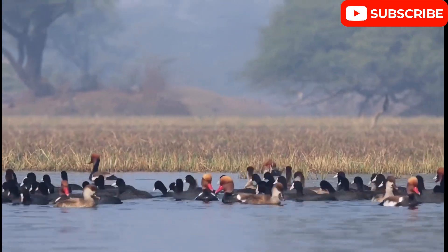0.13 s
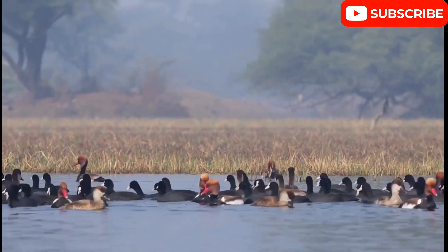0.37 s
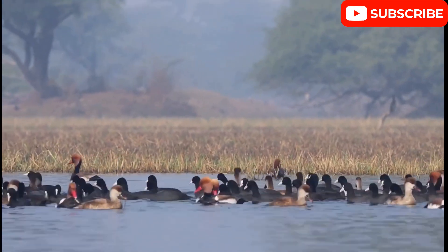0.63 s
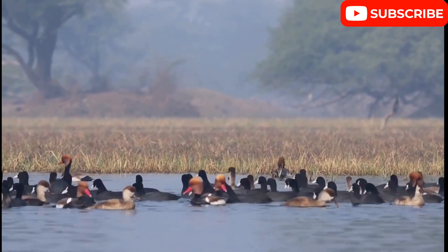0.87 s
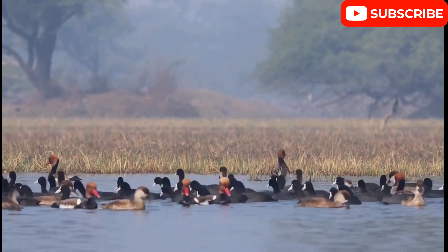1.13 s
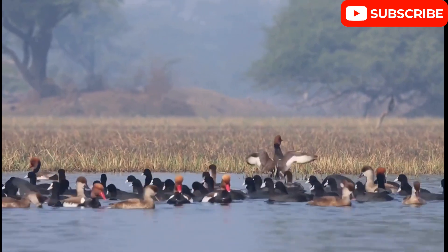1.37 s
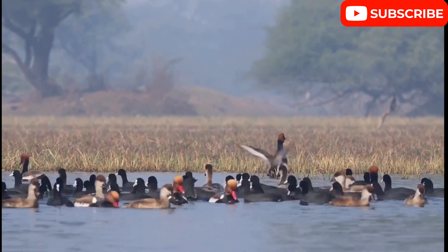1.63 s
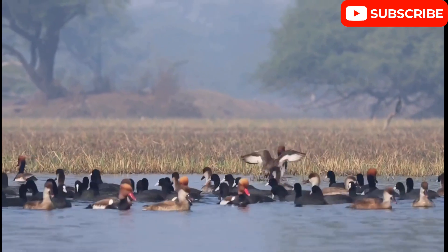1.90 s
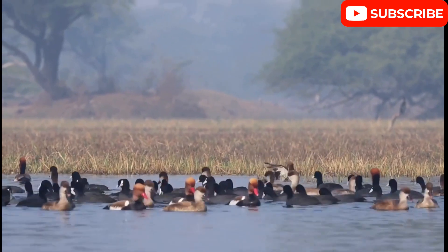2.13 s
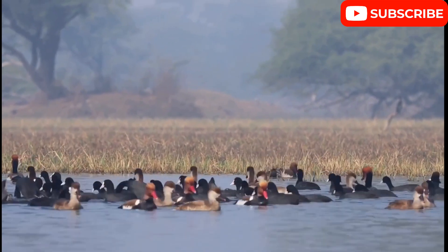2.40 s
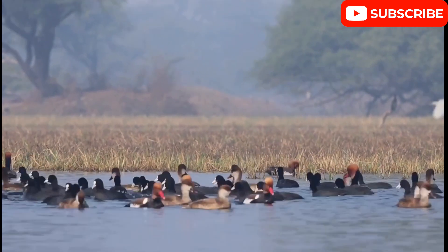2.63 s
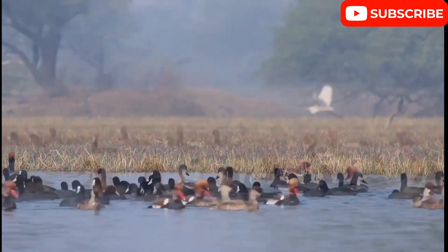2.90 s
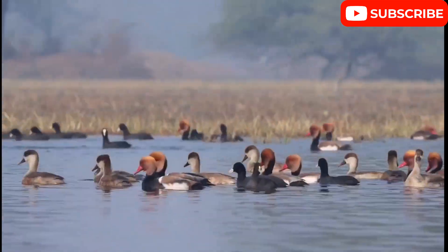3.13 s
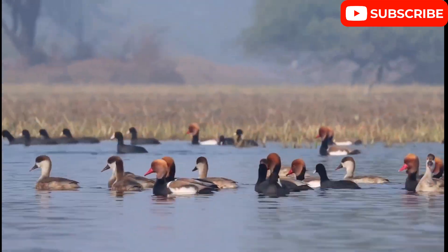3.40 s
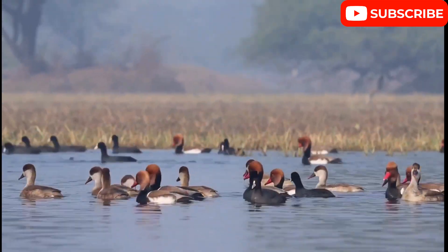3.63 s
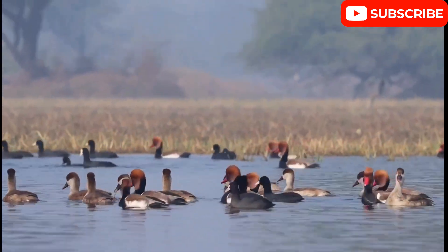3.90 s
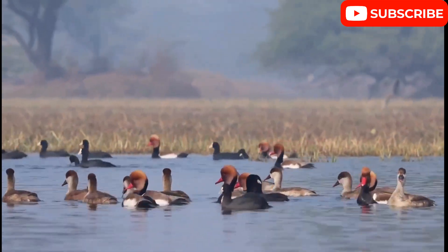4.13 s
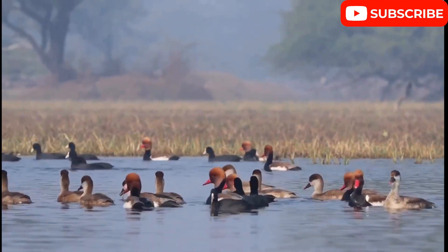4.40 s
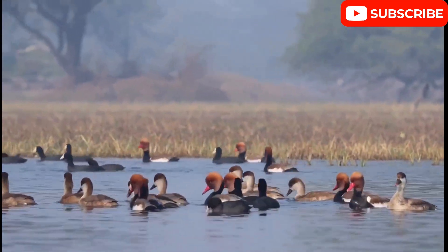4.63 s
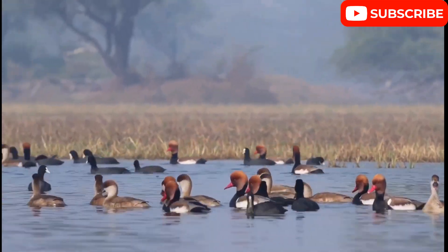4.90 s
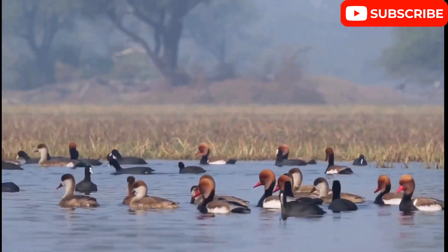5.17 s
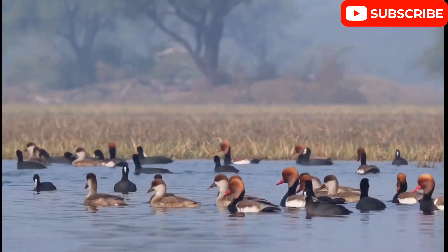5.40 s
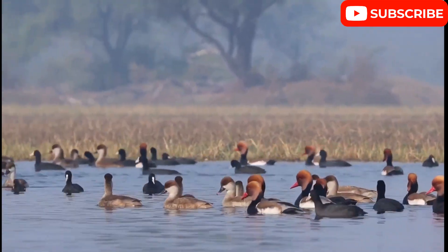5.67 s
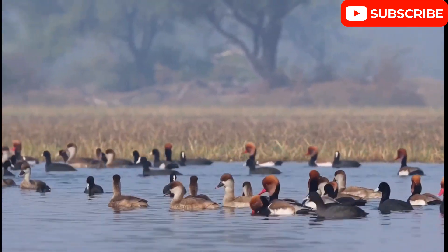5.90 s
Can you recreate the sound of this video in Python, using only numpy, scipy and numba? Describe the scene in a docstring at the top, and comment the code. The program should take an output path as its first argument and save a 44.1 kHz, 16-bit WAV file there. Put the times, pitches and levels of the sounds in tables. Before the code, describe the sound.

A flock of waterbirds rasps and wheezes in quick overlapping bursts with sharp throat clicks, fainter birds gabbling behind over soft lake hiss.

```python
"""A flock of ducks on open water gives short harsh wheezy calls, several birds overlapping.
Each call is a fast uneven pulse train ringing in the windpipe and throat, while a mouth resonance
sweeps up and down as the bill opens. Farther birds are hoarse voices blurred by scattered echoes;
small splashes and a lake hiss, both shaped noise, lie below."""
import sys
import numpy as np
from scipy import signal
from scipy.fft import rfft, irfft, next_fast_len
from scipy.io import wavfile
from scipy.ndimage import uniform_filter1d, minimum_filter1d
from numba import njit

SR = 44100
rng = np.random.default_rng(int(sys.argv[2]) if len(sys.argv) > 2 else 0)


def field_ratio(decibels):
    """Amplitude ratio for a level in dB (20 dB per decade); scalars and array-likes work."""
    return 10 ** (np.asarray(decibels, dtype=float) / 20)


def output_pcm(signal):
    """Save a mono or channel-first signal as 16-bit PCM at the path in sys.argv[1].

    Samples are clipped to [-1, 1] before scaling.
    """
    pcm = np.clip(np.atleast_2d(signal).T, -1, 1) * 32767
    wavfile.write(sys.argv[1], SR, np.round(pcm).astype(np.int16))


N = 266011


def rms_one(x):
    """Scale to unit rms."""
    return x / np.sqrt(np.mean(x ** 2) + 1e-20)


def columns(rows):
    """The samples a table spans, and its columns interpolated along them."""
    s, *values = np.transpose(rows)
    at = np.arange(max(round(s[0] * SR), 0), min(round(s[-1] * SR), N))
    return [at] + [np.interp(at / SR, s, v) for v in values]


def at_hz(points, hz):
    """Read a spectrum on a log-frequency axis."""
    point_hz, values = np.transpose(points)
    return np.interp(np.log(hz), np.log(point_hz), values)


def drift(per_s, size):
    """Random wander: straight lines between unit normal knots, at most 59 knots per s."""
    knots = rng.standard_normal(int(size * 60 / SR) + 60)
    return np.interp(np.arange(size) * np.minimum(per_s, 59) / SR, np.arange(len(knots)), knots)


def add(out, at, sound, pan_db=0.):
    """Mix a sound in with 3 ms soft ends; pan_db is left over right."""
    from_start = np.arange(len(at))
    edge = np.minimum(1, np.minimum(from_start, from_start[::-1]) / (0.003 * SR))
    out[:, at] += sound * edge * field_ratio(np.array([[.5], [-.5]]) * pan_db)


def swelling(loudest, swell_s, release_s, depth_db, bends):
    """The samples of a call, the part of it gone by (-1 start, 0 loudest, 1 end) and its gain."""
    at, part = columns([(loudest - swell_s, -1), (loudest, 0), (loudest + release_s, 1)])
    return at, part, field_ratio(-depth_db * np.abs(part) ** np.where(part < 0, *bends))


@njit
def resonate(x, hz, width_hz, sr):
    """Moving resonance, four passes for dark skirts, back and forth so rings swell as softly as they die."""
    r = np.exp(-np.pi * width_hz / sr)
    for _ in range(4):
        y = np.zeros(len(x))
        for i in range(2, len(x)):
            drive = (1 - r) * (x[i] - x[i - 2])
            y[i] = drive + 2 * r * np.cos(2 * np.pi * hz[i] / sr) * y[i - 1] - r * r * y[i - 2]
        x, hz = y[::-1].copy(), hz[::-1].copy()
    return x


BREATH, WAVER = 2.6, .07
THIRD_PULSE_DB = 2.5   # every third pulse is stronger


def voice(per_s, rough, hz, width_hz):
    """Uneven membrane pulses plus breath gated on each cycle, ringing in one resonance; level evened."""
    size, rough = len(hz), np.clip(rough, 0, 1)
    cycles = np.cumsum(per_s * (1 + WAVER * rough * drift(55, size)) / SR) + rng.random()
    third_db = THIRD_PULSE_DB * (cycles % 3 < 1)
    strength = field_ratio(4.0 * rough * rng.standard_normal(size) + third_db)
    pulses = np.diff(np.floor(cycles), prepend=np.floor(cycles[0])) * strength
    gate = np.exp(-3.0 * (cycles % 1)) * np.sqrt(per_s / SR)
    breath = rng.standard_normal(size) * gate * field_ratio(third_db)
    rung = resonate((1 - rough) * pulses + BREATH * rough * breath, hz, width_hz, SR)
    return rung / np.sqrt(uniform_filter1d(rung ** 2, size=1400) + 1e-12)


# left-right likeness of noise: (f/Hz, likeness 0-1)
NOISE_LIKENESS = [(700, 0.76), (1400, 0.32), (3000, 0.15), (7000, 0.13), (11000, 0.54), (15000, 0.4)]


def coloured(spectrum, patchy_db):
    """Stereo noise in overlapping quarter-octave bands, each with its own flicker; rms 1."""
    size = next_fast_len(N)
    hz = np.maximum(np.arange(size // 2 + 1) * SR / size, 1)
    mid, side = rfft(rng.standard_normal((2, size))) * field_ratio(at_hz(spectrum, hz))
    alike = np.clip(at_hz(NOISE_LIKENESS, hz), 0, 1)
    both = np.sqrt(1 + alike) * mid + np.sqrt(1 - alike) * side * [[1], [-1]]
    out, together = 0, drift(3.11, N)
    for k in range(21):
        share = np.interp(4 * np.log2(hz / 500), np.arange(21), np.arange(21) == k)
        flicker = 0.15 * together + (0.74 + 0.036 * k) * drift(36, N)
        out = out + irfft(both * share, size)[:, :N] * field_ratio(patchy_db * flicker)
    return rms_one(out)


# hiss spectrum of the lake: (f/Hz, relative density/dB per Hz)
LAKE_SPECTRUM = [(290, -108), (500, -62), (810, -35), (1290, -8.5), (1660, -1), (2160, -5.5), (2850, -6),
                 (3400, -7), (5190, -7.5), (7820, -17), (9890, -11.5), (11100, -18), (14900, -12.5),
                 (15800, -15), (16500, -63)]
LAKE_DB = -33.5


def lake_hiss():
    """Flickering broadband water noise, slightly louder on the right."""
    return field_ratio(LAKE_DB) * coloured(LAKE_SPECTRUM, patchy_db=3.0) * field_ratio([[-.8], [.8]])


# small splashes: (t/s, click level/dB before the puff shaping)
SPLASH_CLICKS = [(0.557, -29), (0.7427, -28), (1.5994, -29), (1.8794, -29), (2.6279, -24), (3.3593, -28),
                 (3.4595, -29), (3.5473, -28), (5.435, -26), (5.5368, -28), (5.9705, -27)]
# splash noise spectrum: (f/Hz, relative density/dB per Hz)
SPLASH_SPECTRUM = [(500, -60), (1500, 2), (3500, 1), (7000, -16), (12000, -30)]


def splashes():
    """Each splash is a brief puff of water noise with an exponential rise and fade."""
    t_s, level_db = np.transpose(SPLASH_CLICKS)
    clicks = np.full(N, 1e-18)
    clicks[[round(s * SR) for s in t_s]] = field_ratio(level_db)
    fade = np.exp(-1 / (0.0079 * SR))
    rise = np.exp(-1 / (0.0035 * SR))
    puffs = signal.lfilter([1 - rise], np.convolve([1, -fade], [1, -rise]), clicks)
    return puffs * coloured(SPLASH_SPECTRUM, patchy_db=2)


ECHO_T60_S = 0.06


def echoes(x):
    """Scattered reflections from water and reeds, different on each side."""
    t = np.arange(round(.15 * SR)) / SR
    scatter = rng.standard_normal((2, len(t))) * field_ratio(-60 * t / ECHO_T60_S) * (t > .0015)
    scatter /= np.sqrt(np.sum(scatter ** 2, axis=1, keepdims=True))
    return signal.fftconvolve(x, scatter, axes=1)[:, :N]


# swells of the low gabble: (loudest t/s, length/s, level/dB before distance gain)
FLOCK_SWELLS = [(0.083, .08, -34), (.3, 0.2, -31.5), (.48, 0.3, -32.5), (0.745, 0.054, -27.5),
                (0.856, 0.11, -32.5), (1.607, 0.43, -32), (2.26, 0.17, -33.5), (2.634, 0.035, -27.5),
                (2.92, .1, -35), (3.11, 0.12, -34.5), (3.449, 0.13, -29), (3.745, .1, -34.5),
                (3.86, .14, -35.5), (4.146, 0.1, -35), (5.18, .12, -32), (5.444, 0.021, -28.5),
                (5.746, 0.097, -33), (5.88, 0.055, -32), (5.972, 0.057, -32)]
GABBLE_DB, GABBLE_FLICKER_DB, GABBLE_PER_S = -39.5, 2.5, 11
FAR_DEPTH_DB, FAR_BEND, FAR_WIDTH_HZ = 11, 1.7, 460.   # width per resonator pass


def gabble():
    """Low gabble of the flock: one continuous hoarse voice near 1.6 kHz that swells at times."""
    out = np.zeros((2, N))
    level = field_ratio(GABBLE_DB + GABBLE_FLICKER_DB * drift(GABBLE_PER_S, N))
    for loudest, length, level_db in FLOCK_SWELLS:
        at, _, gain = swelling(loudest, length / 2, length / 2, FAR_DEPTH_DB, (FAR_BEND, FAR_BEND))
        level[at] = np.maximum(level[at], field_ratio(level_db) * gain)
    hoarse = voice(300 + 40 * drift(4, N), .7, 1620 + 120 * drift(8, N), width_hz=990.0)
    add(out, np.arange(N), level * hoarse, -2.)
    return out


CHATTER_DB, CHATTER_FLICKER_DB = -45.5, 5.5


def chatter():
    """The other far birds: one faint continuous hoarse voice of flickering level."""
    out = np.zeros((2, N))
    level = field_ratio(CHATTER_DB + CHATTER_FLICKER_DB * drift(12, N))
    hoarse = voice(330 + 30 * drift(5.8, N), 0.53, 2830 + 60 * drift(9, N), FAR_WIDTH_HZ)
    add(out, np.arange(N), level * hoarse, -1.5)
    return out


# clearest farther birds, thinner and higher: (loudest t/s, length/s, level/dB before distance gain, f/Hz)
CLEAR_FAR_CALLS = [(0.091, .14, -31, 2830), (0.182, 0.03, -42, 2620), (0.464, 0.094, -27.5, 2700),
                   (0.651, 0.14, -32.5, 2800), (.99, 0.16, -30, 2760), (1.301, 0.17, -34, 2820),
                   (1.553, 0.079, -32, 2900), (1.662, 0.21, -30.5, 2710), (1.77, 0.066, -32, 2560),
                   (1.86, .1, -32, 2800), (2.132, 0.26, -33, 2830), (2.386, 0.16, -26, 2750),
                   (2.588, 0.052, -35, 2800), (2.817, 0.14, -27.5, 2740), (2.955, 0.095, -31.5, 2790),
                   (3.089, 0.098, -32, 2700), (3.329, 0.23, -34.5, 2780), (3.505, 0.096, -29.5, 2730),
                   (3.699, 0.11, -30.5, 2860), (3.799, .09, -30, 2860), (4.019, .07, -30.5, 2650),
                   (4.339, .1, -37, 2650), (4.454, .05, -39, 2720), (4.527, 0.036, -37, 2860),
                   (4.588, .06, -38, 2700), (4.7, .08, -36, 2780), (4.85, .26, -34.5, 2880),
                   (5.39, .15, -31, 2760), (5.527, 0.17, -37, 2880), (5.636, 0.057, -28.5, 2640),
                   (5.907, 0.033, -29, 2830), (6.02, 0.11, -33.5, 2870)]


def far_calls():
    """Distant single calls: hoarse pulses in one wandering resonance."""
    out = np.zeros((2, N))
    for loudest, length, level_db, hz in CLEAR_FAR_CALLS:
        at, _, gain = swelling(loudest, length / 2, length / 2, FAR_DEPTH_DB, (FAR_BEND, FAR_BEND))
        size = len(at)
        hoarse = voice(330 + 30 * drift(4.9, size), .6, hz + 40 * drift(20, size), FAR_WIDTH_HZ)
        add(out, at, field_ratio(level_db) * gain * hoarse, -1.5)
    return out


# single throat pulses that stand out: (t/s, peak level/dB, f/Hz)
THROAT_PULSES = [(0.2394, -14, 4930), (0.6809, -13, 4930), (0.7627, -18, 4800), (0.7938, -9, 4730),
                 (0.835, -14, 5120), (2.6324, -16, 4900), (5.0968, 2.5, 5000), (5.135, -6, 5070),
                 (5.1726, 0, 5010), (5.236, -5, 4780), (5.5867, -19, 5100)]
CLUCK_S = .0017


def clucks():
    """Single throat pulses: a brief swelling sine under a Gaussian envelope."""
    out = np.zeros((2, N))
    for s, peak_db, hz in THROAT_PULSES:
        at, t = columns([(s - .006, -.006), (s + .012, .012)])
        envelope = np.exp(-((t - .0025) / CLUCK_S) ** 2)
        add(out, at, field_ratio(peak_db) * envelope * np.sin(2 * np.pi * hz * t))
    return out


# bill snaps: (start t/s, length/s, level/dB, pulse rate/Hz)
BILL_CLOSINGS = [(0.043, 0.042, -25, 270), (0.382, 0.036, -21, 260), (.918, 0.049, -17, 262),
                 (2.329, 0.04, -32, 240), (2.764, 0.033, -29.5, 210), (5.222, 0.033, -29, 170),
                 (5.32, 0.036, -18, 220), (5.728, 0.03, -28, 230)]
CLOSE_FROM_HZ, CLOSE_TO_HZ = 6400, 4580


def closing_rings():
    """The bill snaps shut and the ring slides down."""
    out = np.zeros((2, N))
    for start, length, level_db, per_s in BILL_CLOSINGS:
        at, part = columns([(start, 0), (start + length, 1)])
        hz = CLOSE_TO_HZ + (CLOSE_FROM_HZ - CLOSE_TO_HZ) * (1 - part) ** 1.3
        gain = field_ratio(level_db) * np.sin(np.pi * part) ** 1.6
        add(out, at, gain * voice(per_s, 0.29, hz, width_hz=1230.0), -.5)
    return out


# bill opening and closing: (start t/s, length/s, top f/Hz, level/dB, tilt/dB: -tilt at start to +tilt at end)
BILL_GAPES = [(-.07, 0.12, 7000, -25.5, -14), (-.04, 0.18, 7500, -36, -3), (0.239, 0.19, 9640, -25, 4),
              (0.229, 0.19, 7100, -31.5, -8.5), (0.682, 0.17, 7250, -24, -5.5),
              (0.82, 0.13, 7760, -23.5, -1), (0.789, 0.16, 6990, -17, -4.5), (0.94, 0.18, 5660, -38.5, 0),
              (1.585, 0.15, 7300, -39.5, -12), (2.161, 0.076, 6300, -33.5, 7),
              (2.216, 0.16, 7400, -28.5, -7), (2.346, 0.17, 5470, -39, -14), (2.593, 0.25, 7360, -33, -7.5),
              (2.622, 0.22, 6280, -32, -11), (3.529, 0.094, 7100, -43.5, -14),
              (3.694, 0.069, 5500, -37.5, 3), (4.036, 0.14, 7300, -46.5, -18.5),
              (4.143, 0.079, 7100, -40.5, -7), (4.978, .14, 7350, -35.5, -3),
              (5.098, 0.13, 7050, -16, -9.5), (5.121, 0.2, 7730, -20, -9.5), (5.195, 0.16, 6760, -23, -8.5),
              (5.274, .09, 7530, -28, -3), (5.248, 0.11, 9800, -35.5, -6), (5.577, 0.25, 7580, -40.5, -16)]
SHUT_HZ, MOUTH_WIDTH_HZ, MOUTH_ROUGH = 5000, 1900, .55   # width per resonator pass
MOUTH_PULSES_PER_S, MOUTH_PULSE_SPREAD, MOUTH_PAN_DB, MOUTH_PAN_SPREAD_DB = 325, .07, -0.3, 1.5


def mouth_rings():
    """The mouth resonance rises as the bill opens, holds, and falls as it shuts."""
    out = np.zeros((2, N))
    birds = rng.standard_normal((len(BILL_GAPES), 2))
    for (start, length, top_hz, level_db, tilt_db), bird in zip(BILL_GAPES, birds):
        at, part = columns([(start, 0), (start + length, 1)])
        opening = np.minimum(1, 1.24 * np.sin(np.pi * part ** 0.97)) ** 0.81
        hz = SHUT_HZ + (top_hz - SHUT_HZ) * opening
        # the mouth ring fades as the bill narrows
        aperture = 0.16 * (1 - part) + opening ** (2.03 + 1.5 * part)
        gain = field_ratio(level_db + tilt_db * (2 * part - 1)) * aperture
        per_s = MOUTH_PULSES_PER_S * (1 + MOUTH_PULSE_SPREAD * bird[0])
        pan_db = MOUTH_PAN_DB + MOUTH_PAN_SPREAD_DB * bird[1]
        add(out, at, gain * voice(per_s, MOUTH_ROUGH, hz, MOUTH_WIDTH_HZ), pan_db)
    return out


# throat ring, bill nearly shut: (loudest t/s, swell/s, release/s, level/dB, f/Hz at loudest)
THROAT_RINGS = [(.07, .044, 0.038, -27, 5000), (.112, .01, .03, -32, 4900), (.242, .03, .016, -23, 4880),
                (.35, .12, 0.068, -33, 5270), (.394, .022, 0.056, -19.5, 4820),
                (.682, .02, 0.11, -30, 5000), (.793, .04, .03, -22.5, 4780), (.84, .04, 0.072, -21.5, 5000),
                (.941, .045, 0.058, -17.5, 4680), (1.0, .02, .06, -37, 4760), (1.09, .06, 0.069, -35, 5060),
                (1.73, .01, 0.041, -35.5, 5100), (2.16, .01, .05, -37.5, 5030),
                (2.211, .02, 0.016, -25.5, 5080), (2.349, .03, 0.05, -19.5, 5000),
                (2.455, .12, 0.025, -28, 4870), (2.63, .022, 0.038, -30, 5000),
                (2.74, .04, .06, -27.5, 5100), (2.79, .04, 0.016, -27, 5000), (2.84, .04, .01, -37, 5200),
                (3.565, .05, .026, -34.5, 4870), (3.672, .07, .02, -32.5, 5000),
                (3.728, .05, 0.057, -28.5, 4770), (3.8, .012, 0.032, -37, 4900),
                (4.128, .008, 0.068, -36.5, 5100), (4.179, .022, 0.037, -31.5, 4770),
                (4.282, .025, .017, -31, 5200), (5.08, .15, 0.028, -31.5, 4940),
                (5.13, .025, 0.027, -22, 5200), (5.18, .12, 0.054, -20.5, 5180),
                (5.241, .025, .03, -11.5, 5010), (5.345, .03, .028, -16, 4950),
                (5.42, .04, 0.28, -36.5, 5100), (5.589, .03, 0.015, -27, 5100),
                (5.62, .03, 0.25, -38, 4970), (5.749, .03, 0.017, -18.5, 5100),
                (5.877, .014, 0.043, -33.5, 5320)]
THROAT_DEPTH_DB, THROAT_BEND, THROAT_SAG_HZ = 20.5, 0.86, 60
SLOW_START = .7   # pulses start this fraction slower and speed up


def throat_rings():
    """Throat resonance near 5 kHz, gliding down, driven by pulses that speed up to the loudest point."""
    out = np.zeros((2, N))
    for loudest, swell_s, release_s, level_db, hz in THROAT_RINGS:
        at, part, gain = swelling(loudest, swell_s, release_s, THROAT_DEPTH_DB, (THROAT_BEND, THROAT_BEND))
        per_s = 240. * (1 + SLOW_START * np.minimum(part, 0))
        ring = voice(per_s, .35, hz - THROAT_SAG_HZ * part, width_hz=840.0)
        add(out, at, field_ratio(level_db) * gain * ring, -.8)
    return out


# windpipe ring: (loudest t/s, swell/s, release/s, level/dB, mean f/Hz at loudest, mean pulse rate/Hz)
WINDPIPE_RINGS = [(0.0, .01, 0.085, -17.5, 2410, 373), (.075, 0.039, 0.043, -28.5, 2310, 310),
                  (.345, 0.18, 0.079, -17, 2493, 347), (.8, 0.095, .016, -17.5, 2500, 290),
                  (.9, .1, 0.039, -13, 2363, 365), (.945, .02, 0.033, -30, 2290, 370),
                  (1.38, 0.1, 0.077, -34.5, 2650, 380), (1.7, 0.073, .035, -29, 2380, 350),
                  (2.315, 0.1, 0.033, -17.5, 2386, 327), (2.74, .13, 0.038, -20.5, 2450, 324),
                  (2.98, 0.067, .02, -29, 2380, 370), (3.632, 0.1, 0.022, -18.5, 2470, 347),
                  (3.687, 0.045, 0.017, -28, 2430, 340), (3.915, 0.075, 0.044, -26, 2420, 328),
                  (4.13, 0.086, 0.039, -22, 2390, 344), (4.232, .055, 0.07, -24, 2480, 352),
                  (4.315, 0.043, 0.045, -27, 2450, 386), (5.07, .05, 0.077, -22.5, 2466, 337),
                  (5.185, 0.078, 0.059, -12, 2442, 321), (5.295, .07, 0.048, -16, 2510, 350),
                  (5.69, .065, 0.063, -22, 2397, 385), (5.84, 0.093, 0.047, -23, 2460, 340)]
WINDPIPE_DEPTH_DB, SWELL_BEND, RELEASE_BEND = 21, 2.75, 1.75
PIPE_SAG_HZ, PIPE_WANDER_HZ, PIPE_WIDTH_HZ = 130, 35, 540.   # width per resonator pass
HOARSE_START, HOARSE_END, PULSE_WANDER = .6, .42, .05   # the ring clears as the call swells
WINDPIPE_PAN_DB, PAN_WANDER_DB = -2.5, 2.5   # random left-right wander of the windpipe ring


def windpipe_rings():
    """Windpipe resonance near 2.4 kHz, lower at both ends of the call, driven by a wandering pulse rate."""
    out = np.zeros((2, N))
    for loudest, swell_s, release_s, level_db, hz, per_s in WINDPIPE_RINGS:
        at, part, gain = swelling(loudest, swell_s, release_s, WINDPIPE_DEPTH_DB, (SWELL_BEND, RELEASE_BEND))
        size = len(at)
        rough = HOARSE_END + (HOARSE_END - HOARSE_START) * np.minimum(part, 0)
        pulse_rate = per_s * (1 + PULSE_WANDER * drift(15, size))
        ring_hz = hz - PIPE_SAG_HZ * part ** 2 + PIPE_WANDER_HZ * drift(25.5, size)
        pan_db = WINDPIPE_PAN_DB + PAN_WANDER_DB * drift(18.6, size)
        add(out, at, field_ratio(level_db) * gain * voice(pulse_rate, rough, ring_hz, PIPE_WIDTH_HZ), pan_db)
    return out


ECHO_DB, CLUCK_ECHO_DB = -2.5, -11


def scene():
    """Near birds with direct sound and echoes, far birds quieter with their own echoes, over splashes and lake
    hiss."""
    far = gabble() + chatter() + far_calls()
    single = clucks()
    near = closing_rings() + mouth_rings() + throat_rings() + windpipe_rings()
    direct = near + single + 0.54 * far
    scattered = echoes(field_ratio(ECHO_DB) * near + field_ratio(CLUCK_ECHO_DB) * single + 0.36 * far)
    return direct + scattered + splashes() + lake_hiss()


def top_cut(x):
    """Nothing passes above the cut-off."""
    return signal.sosfilt(signal.butter(12, 16940, fs=SR, output="sos"), x)


# dips in the overall tone: (f/Hz, gain/dB)
TONE_DIPS = [(3000, 0.5), (4250, -4.5), (5000, -1), (8450, -1.5), (8900, -6), (9400, 0), (10500, 1.5),
             (11200, -12.5), (12000, 1)]
# phase between left and right: (f/Hz, left lead/rad)
STEREO_PHASE = [(500, -0.43), (1400, 0.12), (3500, -0.91), (5500, -1.6), (6300, -1.73), (7000, -0.16)]
LOW_CUT_HZ, CEILING = 670, .76   # ceiling acts before the low cut


def record(dry):
    """Dips in the overall tone, a phase step between the channels, a peak limiter, a steep low cut."""
    size = next_fast_len(N)
    hz = np.maximum(np.arange(size // 2 + 1) * SR / size, 1)
    turn = np.exp(.5j * at_hz(STEREO_PHASE, hz) * [[1], [-1]])
    heard = irfft(rfft(dry, size) * field_ratio(at_hz(TONE_DIPS, hz)) * turn, size)[:, :N]
    room_left = np.minimum(1, CEILING / (np.abs(heard).max(axis=0) + 1e-9))
    gain = uniform_filter1d(minimum_filter1d(room_left, size=301), size=301)   # dips smoothly around peaks
    low_cut = signal.butter(6, LOW_CUT_HZ, "high", fs=SR, output="sos")
    mix = signal.sosfilt(low_cut, heard * gain)
    return top_cut(mix)


dry = scene()
out = record(dry)
output_pcm(out)
```